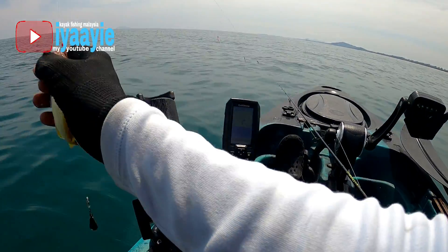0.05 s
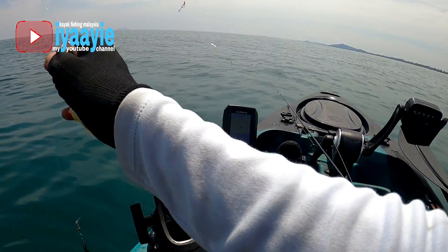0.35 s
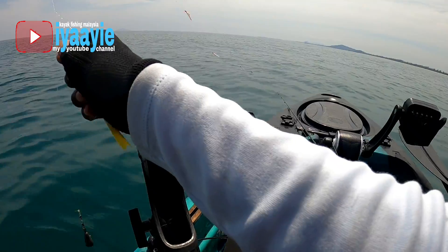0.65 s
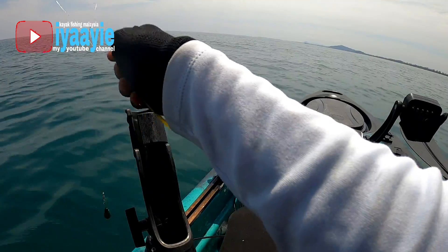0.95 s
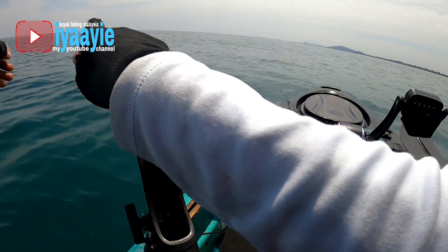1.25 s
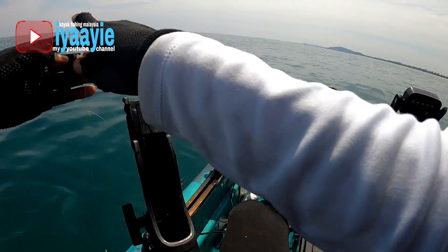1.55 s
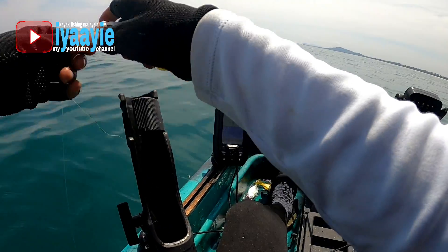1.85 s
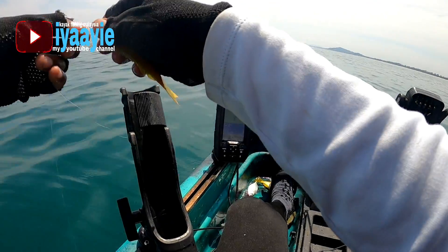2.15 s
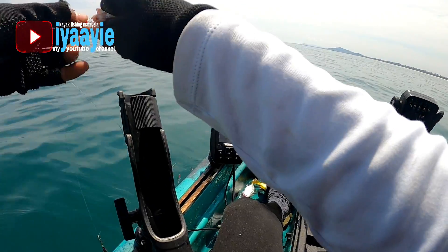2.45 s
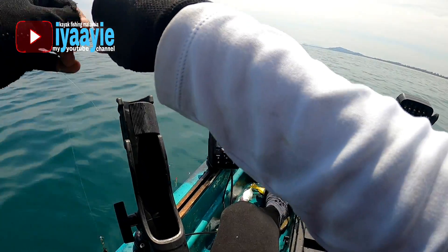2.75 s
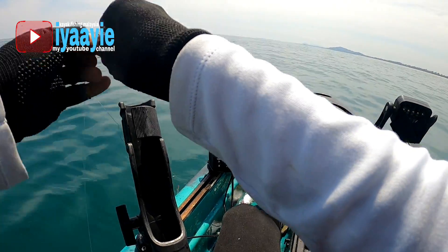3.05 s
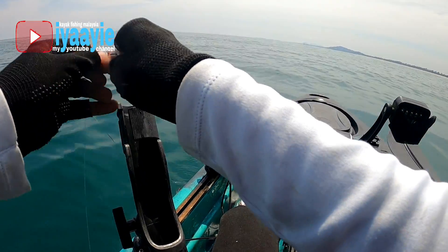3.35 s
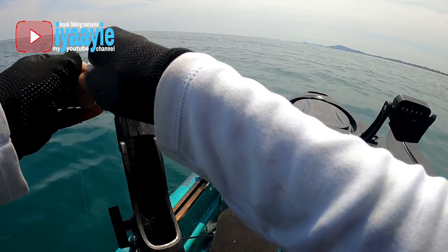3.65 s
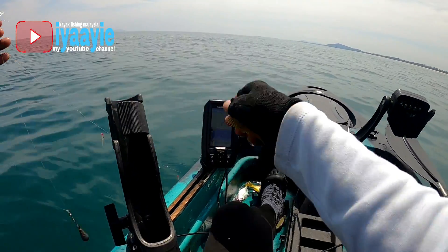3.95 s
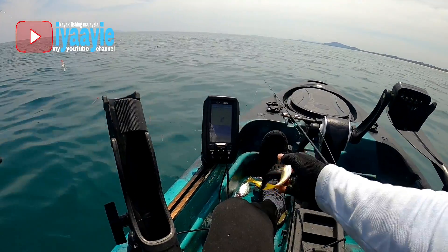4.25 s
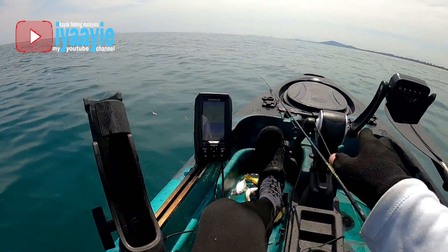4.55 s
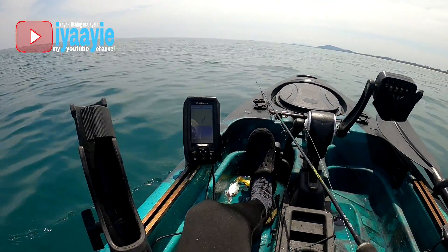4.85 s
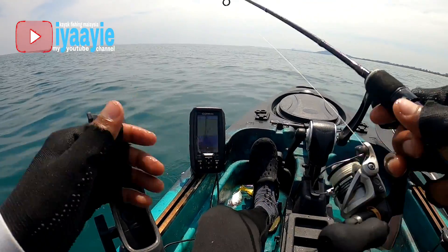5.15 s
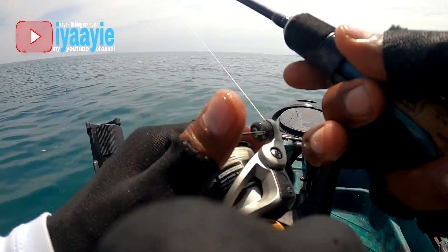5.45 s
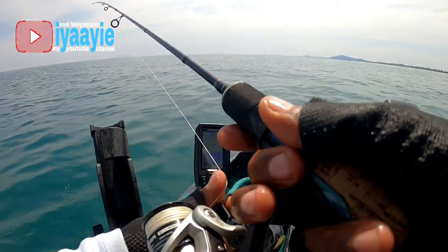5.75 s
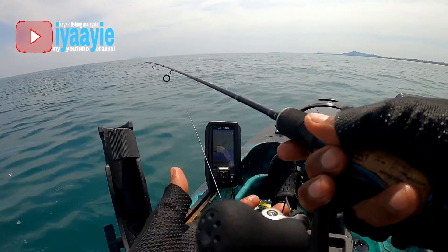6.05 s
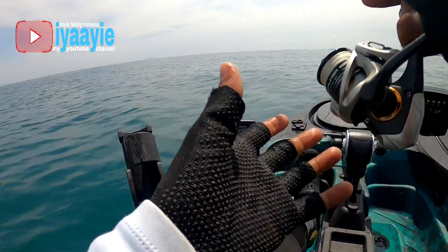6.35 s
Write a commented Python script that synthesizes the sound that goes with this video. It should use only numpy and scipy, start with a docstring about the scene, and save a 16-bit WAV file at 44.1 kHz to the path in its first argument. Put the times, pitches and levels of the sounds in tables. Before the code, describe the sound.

Close to the microphone on a kayak at sea, choppy water knocks on the hollow plastic hull while a low gust of wind swells and fades. After a short gurgle and some small drips, fishing gear takes over with irregular clicks, rod knocks and thuds against the boat. Cloth rubs softly, the reel snaps shut with a loud metallic click, and a few more taps follow over a low slosh.

```python
"""Hollow thumps and slaps come first: chop strikes a plastic kayak at sea and excites the hull's modes.
Fishing gear is handled close by: tackle clicks, the rod knocks and scrapes, a swivel rattles,
sleeves and line rustle by stick-slip friction, and near the end the reel's bail snaps shut.
Bubbles ring, water sloshes under the boat, and turbulent wind rumbles on the microphone."""
import sys
import numpy as np
from scipy import signal
from scipy.fft import rfft, irfft, next_fast_len
from scipy.io import wavfile
from scipy.ndimage import uniform_filter1d, map_coordinates

SR = 44100
rng = np.random.default_rng(int(sys.argv[2]) if len(sys.argv) > 2 else 0)


def generate_wav(sig):
    """Save sig (samples, or channels by samples) to the path in sys.argv[1] as 16-bit PCM at SR."""
    pcm = np.round(np.clip(np.atleast_2d(sig).T, -1, 1) * 32767).astype(np.int16)
    wavfile.write(sys.argv[1], SR, pcm)


N = 282797
AGE = np.arange(SR // 2) / SR  # time since a contact [s]

# midrange spectrum of rubbing cloth and of the rod's tick: (frequency [Hz], level [dB])
RUB_SPECTRUM = [(200, -26.5), (500, 1.5), (900, -3.5), (1700, -1.5), (2800, -4), (4500, -9), (9000, -53.5)]
# treble spectrum of sliding line and of the swivel's tick: (frequency [Hz], level [dB])
HISS_SPECTRUM = [(1200, -30), (2800, -8.5), (4300, -1), (6000, -2.5), (7800, -3), (10000, -9.5),
                 (13000, -16.5), (15500, -60)]


def slaps(hard_db=-30.5, crack_db=-48, crack_growth=1.67, shell_rise_s=0.00027, body_rise_s=0.0026):
    """Impact excitation: chop cracks on the hull, ringing the stiff shell, then the slower hollow body."""
    # slaps of chop: (time [s], shell level [dB], body level [dB])
    impacts = [(0.415, -47, -41), (1.072, -53, -50.5), (1.155, -40.5, -46), (1.385, -25, -18.5),
               (1.448, -34, -24), (1.623, -32.5, -22), (2.003, -32, -25.5), (2.049, -34.5, -33.5),
               (2.152, -55.5, -41.5), (2.46, -40.5, -27), (2.563, -49, -36), (2.607, -37, -32.5),
               (2.637, -44.5, -33.5), (2.731, -48.5, -34), (2.879, -51, -40), (2.907, -48.5, -38),
               (2.954, -58.5, -41.5), (3.037, -50.5, -37.5), (3.064, -51, -35), (3.1, -56, -39),
               (3.616, -50.5, -37), (3.724, -62.5, -39.5)]
    # hull modes, low to high: (frequency [Hz], level [dB], t60 [s])
    hull_modes = [(175.4, -5.5, 0.22), (279, -5, 0.14), (325.9, -1.5, .12), (373.5, -2.5, 0.14),
                  (424.2, -5.5, 0.12), (511, -10.5, 0.088), (693, -2, .08), (776, -6, 0.077),
                  (886, -7, 0.096), (944, -9.5, .13), (1022, -8.5, 0.14), (1189, -2.5, 0.044),
                  (1307, -7.5, .045), (1406, 1.5, 0.034), (1655, -5, .035), (1910, -1, 0.03),
                  (2214, -10.5, 0.041), (2410, -16.5, 0.035), (2820, -22.5, .035)]
    # dense weak panel modes that blur the ring: (frequency [Hz], level [dB])
    panel_spectrum = [(60, -29), (160, -41), (380, -9), (600, 22.5), (900, 11), (1400, 9.5), (2100, -9),
                      (3000, -17), (6000, -40.5)]
    # crack of water on plastic: (frequency [Hz], level [dB])
    crack_spectrum = [(900, -47), (2300, 9.5), (3200, 3), (5000, -0.5), (6300, -9), (8000, -7),
                      (12000, -29), (16000, -30.5)]
    body_modes = [mode for mode in hull_modes if mode[0] < 600]
    shell_modes = hull_modes[len(body_modes):]
    out = np.zeros(N)
    for s, shell_db, body_db in impacts:
        panel = amp(-6) * onset_unit(noise(panel_spectrum, len(AGE)) * fade(0.17))
        tilt = 0.34 * (shell_db - hard_db)  # dB per octave: softer slaps are duller
        tilted = [(hz, db + tilt * np.log2(hz / 1000), t60) for hz, db, t60 in shell_modes]
        shell = onset_unit(ring(tilted, scatter_db=2.5))  # each slap lands on a different spot
        shell = onset_unit((shell + panel) * attack(shell_rise_s))
        body = onset_unit(ring(body_modes, scatter_db=2) * attack(body_rise_s, power=2))
        crack = onset_unit(struck(contact(0.028, chatter=2.2), lambda hz: along(crack_spectrum, hz)))
        edge_db = crack_db + crack_growth * (shell_db - hard_db)
        add(out, s, amp(shell_db) * shell + amp(body_db) * body + amp(edge_db) * crack)
    return out


def thumps(cycles=7, rise_s=0.0012):
    """Damped vibration: soft blows of waves, knees and rod butt push the hull, which then shudders."""
    # dull blows: (time [s], push level [dB], pitch [Hz], shudder level [dB], shudder t60 [s])
    blows = [(0.215, -45, 142, -30.5, 0.4), (0.246, -30, 266, -41, 0.084), (0.423, -24.5, 119, -23.5, 0.37),
             (1.159, -22.5, 200, -17.5, 0.4), (1.217, -17, 141, -19.5, 0.41),
             (1.477, -21.5, 133, -41, 0.15), (1.797, -22, 136, -30.5, 0.075), (1.912, -19, 158, -43, 0.17),
             (2.012, -18, 44.6, -16.5, 0.28), (2.184, -26, 143, -22, 0.25),
             (2.239, -21.5, 200, -27.5, 0.078), (2.37, -24, 131, -29.5, 0.72),
             (2.442, -20, 178, -61, 0.083), (2.951, -24, 116.5, -22, 0.12), (3.364, -21, 153, -30, 0.18),
             (3.414, -19.5, 164, -37, 0.23), (4.188, -56, 190, -29, 0.26), (4.758, -7.5, 267, -26.5, 0.62),
             (4.791, -20, 200, -46.5, 0.11), (4.828, -18, 189, -33.5, 0.75), (4.994, -25, 243, -31, 0.15),
             (5.206, -19, 129, -45, 1), (5.615, -13, 68.5, -37, 0.088), (5.628, -41, 143, -12.5, 0.071),
             (5.758, -7, 240, -14.5, 0.16), (5.816, -13.5, 149, -23, 0.094),
             (6.042, -27, 58.3, -15.5, 0.087), (6.108, -30.5, 127, -38, 0.23), (6.109, -36, 127, -37, 0.18),
             (6.284, -12.5, 194, -20.5, 0.32)]
    out = np.zeros(N)
    for s, push_db, hz, shudder_db, t60 in blows:
        push = crest(np.sin(2 * np.pi * hz * AGE) * fade(cycles / hz) * attack(0.5 / hz, power=2))
        spectrum = [(hz / 4, -16), (hz * 0.45, -2), (hz, 0), (hz * 1.84, -9),
                    (hz * 3, -26), (hz * 8, -50), (hz * 30, -90)]
        rumble = noise(spectrum, len(AGE))
        running_rms = np.sqrt(np.abs(uniform_filter1d(rumble ** 2, size=1500)) + 1e-9)
        shudder = rumble / running_rms * fade(t60) * attack(rise_s)
        add(out, s, amp(push_db) * push + amp(shudder_db) * shudder)
    return out


def bail(ring_db=-27, lead_in_db=-30, hand_t60=0.07, pre_ring_t60=0.054, pre_hiss_t60=0.076):
    """Modal ringing: a brief ringing hiss swells into the bail's sharp metallic snap on its stop."""
    # the bail meets its stop: (time [s], level [dB])
    closings = [(5.6152, -1.5)]
    # metal modes of the reel before the hand damps them: (frequency [Hz], level [dB], t60 [s])
    reel_modes = [(1090, -4, 0.12), (1420, -14, .04), (1700, 2, .025), (1900, 2, 0.023), (2270, 2, 0.062),
                  (2710, 4, 0.085), (3190, 0, 0.22), (3900, -3, 0.093), (4340, -10, 0.081),
                  (4905, 5, 0.032), (5400, -20, .05), (5710, -1, 0.23), (6330, -3, .045), (6750, -4.5, 0.1),
                  (8280, -8.5, 0.15), (8800, -22, 0.059)]
    # spectrum of the snap and the hiss before it: (frequency [Hz], level [dB])
    snap_spectrum = [(150, 11.5), (800, -9.5), (1500, 7.5), (2100, 2), (3700, 4), (4900, 3), (7000, -8.5),
                     (10000, -12.5), (13000, -25), (15500, -47)]
    out = np.zeros(N)
    for s, db in closings:
        snap = crest(struck(contact(0.015, chatter=1.38), lambda hz: along(snap_spectrum, hz)))
        metal = ring(reel_modes, scatter_db=1) * fade(hand_t60)
        add(out, s, amp(db) * (snap + amp(ring_db) * metal))
        pre_ring = ring([(hz, level, pre_ring_t60) for hz, level, _ in reel_modes], scatter_db=5.5)
        pre_hiss = noise(snap_spectrum, len(AGE)) * fade(pre_hiss_t60)
        lead_in = (pre_ring + pre_hiss)[::-1]  # reversed decays swell up to the snap
        add(out, s - len(AGE) / SR, amp(db + lead_in_db) * lead_in)
    return out


def knocks(tick_db=-7, tick_t60=0.042):
    """Tube modes: the hollow rod knocks on gunwale and reel; the grip sets its pitch and butt ring."""
    # knocks: (time [s], level [dB], main ring [Hz], butt level [dB], rattle t60 [s])
    impacts = [(4.6782, -10, 2890, 0, 0.0052), (6.0877, -11.5, 1665, -5.5, 0.034),
               (6.2016, -20, 3670, -12.5, 0.037)]
    # modes of the tube: (ratio to main ring, level [dB], t60 [s])
    rod_modes = [(0.8, -2, 0.0059), (1, -1, 0.01), (1.145, -8, 0.024), (1.25, -10.5, 0.01),
                 (1.9, -17, 0.0095)]
    # lower modes of the butt: (ratio to main ring, level [dB], t60 [s])
    butt_modes = [(0.205, -0.5, 0.022), (0.27, -8, 0.053), (0.47, -7.5, 0.014)]
    out = np.zeros(N)
    for s, db, hz, butt_db, rattle_t60 in impacts:
        modes = [(ratio, level + butt_db, t60) for ratio, level, t60 in butt_modes] + list(rod_modes)
        tube = sum((-1) ** k * amp(level) * fade(t60) * np.sin(2 * np.pi * hz * ratio * AGE)
                   for k, (ratio, level, t60) in enumerate(modes))
        tube = crest(signal.fftconvolve(contact(rattle_t60, chatter=1), tube)[:len(AGE)])
        tick = crest(struck(contact(tick_t60, chatter=1), lambda f: along(RUB_SPECTRUM, f)))
        add(out, s, amp(db) * (tube + amp(tick_db) * tick))
    return out


def clicks(skirt_db_per_octave=12, ring_db=-8, slide_db=-19, slide_t60=0.029):
    """Hard contact: small parts slide, meet and ring briefly; the smaller the part, the brighter."""
    # tackle, rod and reel contacts: (time [s], level [dB], band centre [Hz], chatter t60 [s])
    impacts = [(0.322, -46.5, 5750, 0.035), (0.435, -41.5, 4270, 0.017), (0.588, -35, 3900, 0.031),
               (0.605, -34.5, 5330, 0.0068), (1.572, -24, 4850, 0.0048), (1.641, -30.5, 5400, 0.052),
               (2.328, -56, 3200, 0.016), (2.328, -53, 3200, 0.016), (2.847, -45, 1900, 0.014),
               (2.847, -49.5, 1900, 0.015), (3.229, -44.5, 7900, 0.012), (3.359, -34.5, 5870, 0.054),
               (3.389, -38.5, 9100, 0.045), (3.964, -47, 3780, 0.026), (4.012, -39.5, 5040, 0.059),
               (4.172, -41, 4300, 0.048), (4.718, -22.5, 833, 0.029), (4.76, -35.5, 6650, 0.098),
               (4.906, -35, 6460, 0.057), (4.993, -29.5, 4330, 0.036), (5.029, -41.5, 4200, 0.0089),
               (5.456, -32.5, 2550, 0.085), (5.494, -36.5, 4340, 0.012), (5.537, -35, 4870, 0.0099),
               (5.55, -29.5, 5340, 0.005), (5.633, -19.5, 1680, 0.022), (5.759, -19, 580, 0.055),
               (5.812, -10, 3580, 0.034), (5.859, -25, 4700, 0.0093), (5.866, -20, 2360, 0.011),
               (6.159, -23, 2440, 0.038), (6.22, -30, 2940, 0.013), (6.355, -25.5, 5030, 0.037),
               (6.369, -28, 1170, 0.11), (6.372, -25.5, 5000, 0.1), (6.405, -23.5, 4200, 0.017)]
    # response of hard plastic: (frequency [Hz], level [dB])
    plastic_spectrum = [(100, 5), (400, 32.5), (1500, 2), (4800, -6.5), (7000, -9.5), (10000, -10.5),
                        (13000, -22.5), (16000, -32)]
    out = np.zeros(N)
    for s, db, centre_hz, t60 in impacts:
        def colour(hz):
            return along(plastic_spectrum, hz) - skirt_db_per_octave * abs(np.log2((hz + 1) / centre_hz))
        tick = crest(struck(contact(t60, chatter=1.42), colour))
        octaves = 0.253 * (np.linspace(-2, 2, 7) + 0.5 * rng.uniform(-1, 1, 7))
        modes = [(hz, colour(hz), 0.62 * t60) for hz in centre_hz * 2 ** octaves]
        tone = crest(ring(modes, scatter_db=-1) * attack(0.000085))
        rising_force = rng.standard_normal(len(AGE)) * fade(slide_t60)[::-1]
        slide = crest(struck(rising_force, colour))[-SR // 40:]
        add(out, s - len(slide) / SR, amp(db + slide_db) * slide)
        add(out, s, amp(db) * (tick + amp(ring_db) * tone))
    return out


def swivel(ring_t60=0.008, tick_db=-8, tick_t60=0.0047):
    """Heavy damping: the steel swivel rattles on the tackle, and fingers cut its ring to a dry click."""
    # rattles: (time [s], level [dB], base frequency [Hz], rattle t60 [s])
    rattles = [(0.126, -46.5, 3970, 0.03), (0.693, -42, 3740, 0.11), (0.792, -46.5, 4140, 0.047),
               (2.511, -46.5, 3750, 0.011), (2.847, -35.5, 3820, 0.016)]
    # modes of the swivel: (ratio to base frequency, level [dB])
    steel_modes = [(1.002, -3), (1.045, -15), (1.11, -1), (1.28, -10), (1.62, -22)]
    out = np.zeros(N)
    for s, db, hz, rattle_t60 in rattles:
        tick = crest(struck(contact(tick_t60, chatter=11), lambda f: along(HISS_SPECTRUM, f)))
        steel = ring([(hz * ratio, level, ring_t60) for ratio, level in steel_modes], scatter_db=1)
        steel = crest(signal.fftconvolve(contact(rattle_t60, chatter=1.6), steel)[:len(AGE)])
        add(out, s, amp(db) * (steel + amp(tick_db) * tick))
    return out


def scrapes(slips_per_s=900, scatter_db=4, q=16, rush_db=-14):
    """Stick-slip excitation: irregular slips drive the resonances of the rod and its guides."""
    # scrapes of line, glove and rod: (middle [s], length [s], level [dB], resonance [Hz])
    slides = [(0.016, 0.034, -55.5, 1690), (0.558, 0.021, -51, 2170), (0.666, 0.021, -61.5, 2170),
              (4.908, 0.018, -44, 3660), (4.942, 0.025, -49.5, 4770), (4.953, 0.0091, -50, 2700),
              (4.997, 0.019, -51.5, 4160), (5.015, 0.033, -52, 1394), (5.722, 0.022, -50.5, 5400),
              (5.802, 0.015, -39, 4700), (6.16, 0.0075, -42, 6400), (6.338, 0.0061, -41, 3340),
              (6.358, 0.019, -41.5, 4770), (6.374, 0.023, -43, 2190)]
    # modes of rod and guides: (ratio to resonance, level [dB])
    guide_modes = [(0.62, -1), (1, 4), (1.17, -1.5), (1.55, -8.5)]
    out = np.zeros(N)
    for s, length, db, hz in slides:
        def response(f):
            return sum((-1) ** k * amp(level) * 1j * f / (q * (hz * ratio - f * f / (hz * ratio)) + 1j * f)
                       for k, (ratio, level) in enumerate(guide_modes))
        lead_s = min(s, 2 * length)
        slipping = rng.random(len(AGE)) < slips_per_s / SR
        slips = slipping * amp(scatter_db * rng.standard_normal(len(AGE)))
        force = unit(slips - slips.mean()) + amp(rush_db) * rng.standard_normal(len(AGE))
        rattle = filtered(force * np.exp(-2 * ((AGE - lead_s) / length) ** 2), response)
        add(out, s - lead_s, amp(db) * rattle * np.sqrt(length * SR) / np.linalg.norm(rattle))
    return out


def rustle(rub_db=-1, hiss_db=-1.5, side_db=-3, rest_rub_db=-82):
    """Sliding friction: sleeves and gloves rub in uneven strokes, and wet line hisses over the rod."""
    # faint hiss between strokes: (time [s], level [dB])
    rest_hiss = [(0, -71.5), (1.95, -77.5), (2.3, -78), (3.15, -77), (3.4, -70.5), (4.4, -81.5)]
    rub_gain, hiss_gain = arm_motion()
    rub_gain += amp(rest_rub_db)
    hiss_gain += amp(curve(rest_hiss))
    flutter_db = 2 * wobble(35) + 2.5 * wobble(130)
    coarse = grains(lo_hz=700, hi_hz=4200, cycles=16, count=3500)
    fine = grains(lo_hz=2800, hi_hz=12000, cycles=25, count=7000)
    rub = rub_gain * amp(rub_db + flutter_db) * friction(RUB_SPECTRUM, coarse, grain_db=0.5)
    hiss = hiss_gain * amp(hiss_db + flutter_db) * friction(HISS_SPECTRUM, fine, grain_db=-1)
    side = rub_gain * noise(RUB_SPECTRUM, N) + hiss_gain * noise(HISS_SPECTRUM, N)
    return stereo(rub + hiss, amp(side_db) * side)


def arm_motion():
    """Superposition: smooth arm strokes sum to two gains, for rub and for hiss."""
    # strokes of sleeve, glove and line: (middle [s], length [s], rub level [dB], hiss level [dB])
    strokes = [(0.297, 0.95, -69.5, -111), (0.58, 0.03, -66, -62), (0.782, 0.18, -77, -79.5),
               (1.578, 0.11, -57.5, -83), (4.034, 0.13, -57.5, -66), (4.6, 0.036, -71.5, -62),
               (4.748, 0.14, -48, -62), (4.943, 0.08, -47, -54.5), (5.245, 0.32, -71.5, -75),
               (5.525, 0.1, -59, -66), (5.779, 0.11, -47, -54), (6.084, 0.14, -54.5, -62),
               (6.368, 0.2, -46, -60)]
    return sum(np.outer(amp([rub_db, hiss_db]), swell(s, length)) for s, length, rub_db, hiss_db in strokes)


def friction(spectrum, slips, grain_db):
    """Stick-slip of fibres: tiny snaps over a smooth rush."""
    snaps = unit(filtered(slips, lambda hz: amp(along(spectrum, hz))))
    return unit(noise(spectrum, N) + amp(grain_db) * snaps)


def grains(lo_hz, hi_hz, cycles, count, spread_db=3.6):
    """Shot noise: tiny damped rings at random times, pitches and strengths."""
    when, pitch, chance, phase = rng.random((count, 4)).T[:, :, None]
    step = np.arange(400)
    turns = lo_hz * (hi_hz / lo_hz) ** pitch * step / SR
    strength = amp(spread_db * np.minimum(-np.log(1 - chance), 4))
    envelope = np.exp(-np.log(1000) * turns / cycles) * (1 - np.exp(-turns))
    waves = strength * np.sin(2 * np.pi * (turns + phase)) * envelope
    return np.bincount(((when * N).astype(int) + step).ravel(), waves.ravel(), N)[:N]


def drops(level_db=-1, cycles=42, climb=0.39, splash_db=-9, splash_t60=0.089):
    """Bubble resonance: a drop splashes and traps air, whose pitch climbs as it nears the surface."""
    # drops and plops in the sea: (time [s], level [dB], starting pitch [Hz])
    plops = [(0.211, -33.5, 648), (0.29, -48, 1740), (0.42, -42.5, 1500), (1.078, -39, 860),
             (3.917, -52.5, 1110), (3.933, -44, 3530), (3.985, -49, 1065), (4.017, -43.5, 2690),
             (4.029, -42, 750), (4.041, -48, 2780), (4.046, -44, 1630), (4.1, -38.5, 1330),
             (4.101, -34, 1690), (4.631, -45, 1250), (4.977, -42, 1780), (6.291, -32, 1310)]
    out = np.zeros(N)
    for s, db, hz in plops:
        life = cycles / hz
        pitch = hz * (1 + climb * np.tanh(2 * AGE / life))
        bubble = crest(np.sin(2 * np.pi * np.cumsum(pitch) / SR) * fade(life) * attack(0.00044))
        spectrum = [(hz / 2, -18), (hz, 0), (hz * 2, -10), (hz * 5, -32), (hz * 16, -65)]
        splash = crest(noise(spectrum, len(AGE)) * fade(splash_t60))
        add(out, s, amp(db + level_db) * (bubble + amp(splash_db) * splash))
    return out


def washes(rise_s=0.0017):
    """Decaying flow noise: a broken wave drains off the hull in a short, bubbly hiss."""
    # waves breaking along the side: (time [s], level [dB], t60 [s])
    breakers = [(0.213, -47.5, 0.38), (1.154, -32, 0.42), (1.392, -35.5, 0.2), (2.05, -43.5, 0.23),
                (2.606, -52, 0.18), (2.881, -50, 0.3), (3.04, -49.5, 1)]
    # spectrum of the spray: (frequency [Hz], level [dB])
    spray_spectrum = [(150, -18), (450, 8.5), (800, -2.5), (2000, -13.5), (3500, -29), (9000, -50)]
    out = np.zeros(N)
    for s, db, t60 in breakers:
        bubbling = amp(2 * wobble(120)[:len(AGE)])
        add(out, s, amp(db) * bubbling * noise(spray_spectrum, len(AGE)) * fade(t60) * attack(rise_s))
    return out


def gurgle(churn_db=3):
    """Cavity resonance: a wave runs along the side and sounds a hollow of the hull."""
    # strength of the gurgle: (time [s], level [dB])
    flow_levels = [(3.3, -77), (3.398, -38), (3.464, -46.5), (3.608, -39), (3.85, -56.5), (3.9, -53)]
    # response of the hollow: (frequency [Hz], level [dB])
    cavity_spectrum = [(150, -13), (300, 18), (360, 9.5), (450, 19.5), (520, -3.5), (600, -7), (900, -10),
                       (1800, -22), (4000, -57)]
    return amp(curve(flow_levels, outside=-120) + churn_db * wobble(43)) * noise(cavity_spectrum, N)


def wind_and_swell(calm_db=-52, slosh_db=-63, slosh_exponent=0.53, rocking_db=4):
    """Turbulence: wind buffets the ports; water churns as rumbling surges and the arms rock the hull."""
    # breeze at the microphone: (time [s], level [dB])
    breeze_levels = [(0, -68), (0.45, -73), (0.63, -41.5), (1.0, -61), (1.3, -42.5), (1.665, -40),
                     (1.69, -23), (2.3, -25), (2.6, -25.5), (3.1, -36), (6.41, -71.5)]
    # surges from swell and shifting weight: (middle [s], length [s], level [dB])
    surges = [(0.373, 0.28, -50), (1.227, 0.17, -32), (2.245, 0.06, -20.5), (2.64, 0.17, -29.5),
              (3.15, 0.19, -29), (3.399, 0.2, -26), (3.797, 0.07, -34.5), (4.429, 0.69, -39.5),
              (5.264, 0.14, -23.5), (5.816, 0.26, -32.5), (6.233, 0.76, -34)]
    # rumble of wind and hull: (frequency [Hz], level [dB])
    rumble_spectrum = [(10, -18.5), (25, -3), (50, 1.5), (90, -3.5), (140, -9), (250, -21), (600, -80.5),
                       (2000, -100)]
    # water under the boat: (frequency [Hz], level [dB])
    slosh_spectrum = [(50, -15), (110, -8.5), (170, 10.5), (300, -0.5), (440, -4), (600, -18.5),
                      (1000, -26), (2000, -26.5), (6000, -85.5)]
    heave = amp(calm_db) + sum(amp(db - 1) * plateau(s, length) for s, length, db in surges)
    buffet = amp(curve(breeze_levels) + 7.2 * wobble(8.6))
    heave_slosh = amp(slosh_db) * (heave / amp(calm_db)) ** slosh_exponent
    arm_slosh = amp(rocking_db) * arm_motion()[0]
    slosh = np.hypot(heave_slosh, arm_slosh) * amp(2.8 * wobble(30))
    rumble = np.hypot(amp(-7) * buffet, heave)
    mid = rumble * noise(rumble_spectrum, N) + slosh * noise(slosh_spectrum, N)
    side = amp(3) * buffet * noise(rumble_spectrum, N) + amp(-6) * slosh * noise(slosh_spectrum, N)
    return stereo(mid, side)


def puffs():
    """Uncorrelated pressure: short eddies flutter over each microphone port separately."""
    # puffs of wind: (middle [s], length [s], level [dB])
    eddies = [(1.807, 0.015, -30.5), (1.911, 0.028, -29.5), (2.0, 0.016, -20.5), (2.054, 0.014, -19),
              (2.22, 0.084, -29), (2.412, 0.14, -33.5), (2.675, 0.039, -36), (2.943, 0.034, -34.5)]
    # spectrum of an eddy: (frequency [Hz], level [dB])
    eddy_spectrum = [(40, 6.5), (130, 5.5), (300, -4), (500, -25), (1000, -38), (3000, -47), (8000, -76)]
    strength = sum(amp(db) * plateau(s, length) for s, length, db in eddies)
    return strength * np.array([noise(eddy_spectrum, N), noise(eddy_spectrum, N)])


def hull_spread(x):
    """Multipath radiation: the whole hull sounds, so the treble differs from port to port."""
    # gain of the side signal: (frequency [Hz], level [dB])
    side_spectrum = [(150, -29), (600, -9.5), (1300, 0.5), (3000, 4), (9000, -10)]
    paths = rng.standard_normal(200)
    diffuse = signal.fftconvolve(x, paths / np.linalg.norm(paths))[:N]
    return stereo(0, filtered(diffuse, lambda hz: amp(along(side_spectrum, hz))))


def placed(x, left_db, left_lead_s):
    """Level and time cues between the ports; with a negative lead the left one hears later."""
    half = np.array([[1], [-1]]) / 2
    return filtered(x, lambda hz: amp(half * left_db) * np.exp(2j * np.pi * hz * half * left_lead_s))


def contact(t60, chatter):
    """Contact force: one impulse, then dying chatter of the two surfaces."""
    force = rng.standard_normal(len(AGE)) * fade(t60)
    return chatter * force / np.linalg.norm(force) + (AGE == 0)


def struck(force, level_db, size=2048):
    """Minimum-phase response to a force of a body whose spectrum is level_db(hz)."""
    magnitude = np.maximum(amp(level_db(np.fft.rfftfreq(size, 1 / SR))), 1e-6)
    cepstrum = irfft(np.log(magnitude))
    cepstrum[1:size // 2] *= 2
    cepstrum[size // 2 + 1:] = 0
    return signal.fftconvolve(force, irfft(np.exp(rfft(cepstrum))))[:len(force)]


def ring(modes, scatter_db):
    """Modal sum: damped sines with new strengths and phases for each blow."""
    draws = rng.standard_normal((len(modes), 2))
    return sum(amp(db + scatter_db * offset) * fade(t60) * np.sin(2 * np.pi * (hz * AGE + phase))
               for (hz, db, t60), (offset, phase) in zip(modes, draws))


def noise(spectrum, size):
    """Coloured noise of rms 1."""
    return unit(filtered(rng.standard_normal(size), lambda hz: amp(along(spectrum, hz))))


def filtered(x, response):
    """Linear filter: the spectrum of x times response(hz)."""
    n = x.shape[-1]
    padded = next_fast_len(n + 8192)
    return irfft(rfft(x, padded) * response(np.fft.rfftfreq(padded, 1 / SR)), padded)[..., :n]


def fade(t60):
    """Exponential decay, 60 dB in t60 seconds."""
    return np.exp(-np.log(1000) * AGE / t60)


def attack(rise_s, power=1):
    """Exponential approach from 0 to 1."""
    return 1 - np.exp(-(AGE / rise_s) ** power)


def swell(middle, length):
    """A smooth rise and fall, peak 1."""
    near = np.exp(-2 * np.abs(np.arange(N) / SR - middle) / length)
    return 2 * near / (1 + near ** 2)


def plateau(middle, length, edge_s=0.0098):
    """A quick rise, a hold and a quick fall."""
    return .5 + .5 * np.tanh((length / 2 - np.abs(np.arange(N) / SR - middle)) / (2 * edge_s))


def wobble(rate):
    """A smooth random curve, rate knots a second."""
    return map_coordinates(rng.standard_normal(int(N * rate / SR) + 4), [np.arange(N) * rate / SR])


def curve(points, outside=None):
    """Interpolate (time, value) points at every sample."""
    return np.interp(np.arange(N) / SR, *np.transpose(points), left=outside, right=outside)


def along(points, hz):
    """Interpolate (frequency, level) points on a log axis."""
    frequencies, levels = np.transpose(points)
    return np.interp(np.log(hz + 1), np.log(frequencies + 1), levels)


def amp(db):
    """Decibels to gain."""
    return 10 ** (np.asarray(db) / 20)


def unit(x):
    """Scale to rms 1."""
    return x / np.sqrt(np.mean(x ** 2) + 1e-20)


def onset_unit(x):
    """Scale the first 25 ms to rms 1."""
    return x / np.sqrt(np.mean(x[:SR // 40] ** 2) + 1e-20)


def crest(x):
    """Scale to peak 1."""
    return x / np.abs(x).max()


def add(track, s, sound):
    """Mix a sound into a track at s seconds."""
    part = track[round(s * SR):][:len(sound)]
    part += sound[:len(part)]


def stereo(mid, side):
    """Mid and side to left and right."""
    return np.array([mid + side, mid - side])


def scene():
    """Free field: open water gives no echo, so all is heard directly; the image narrows to the centre."""
    # stereo width: (time [s], side gain [0-1])
    widths = [(0, 1), (2.5, 0.25), (2.9, 0.04), (3.4, 0.08), (3.55, 0), (6.41, 0.01)]
    chop = slaps() + washes()
    hull = placed(chop, left_db=3, left_lead_s=-0.000043) + hull_spread(chop)
    hull += placed(thumps(), left_db=1, left_lead_s=-0.000041)
    gear = clicks() + knocks() + swivel() + scrapes() + bail()
    left, right = hull + gear + drops() + gurgle() + rustle() + wind_and_swell()
    return stereo((left + right) / 2, curve(widths) * (left - right) / 2) + puffs()


def record(dry):
    """Saturation and band limiting: the loudest peak is rounded off and the top treble is cut."""
    ceiling, top_hz = 0.85, 15700
    limited = dry / (1 + (dry / ceiling) ** 6) ** (1 / 6)
    return filtered(limited, lambda hz: 1 / (1 + (hz / top_hz) ** 90))


dry = scene()
out = record(dry)
generate_wav(out)
```